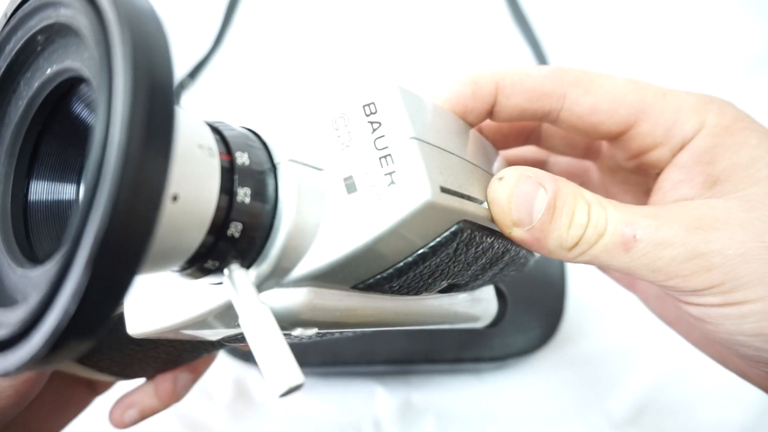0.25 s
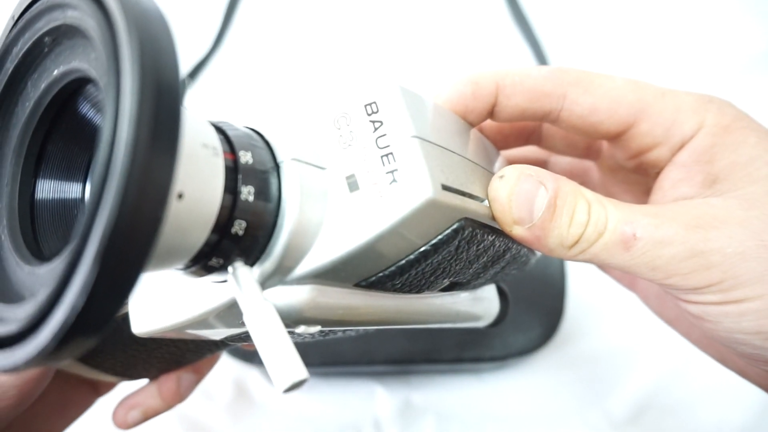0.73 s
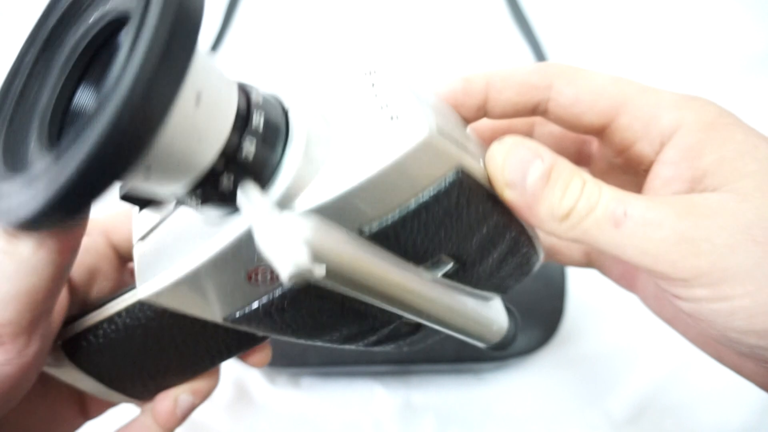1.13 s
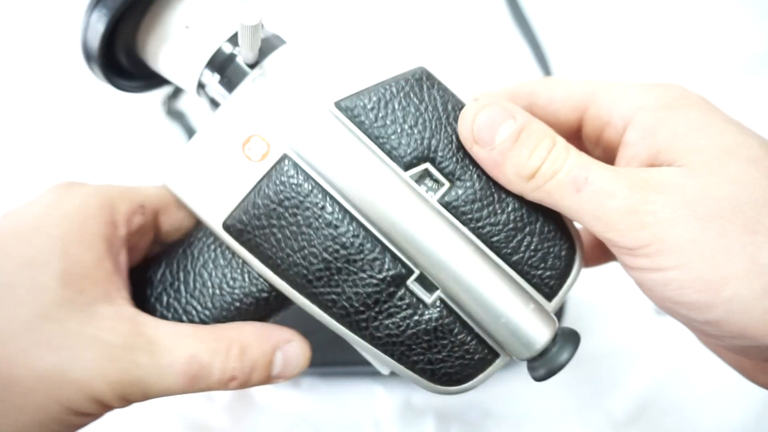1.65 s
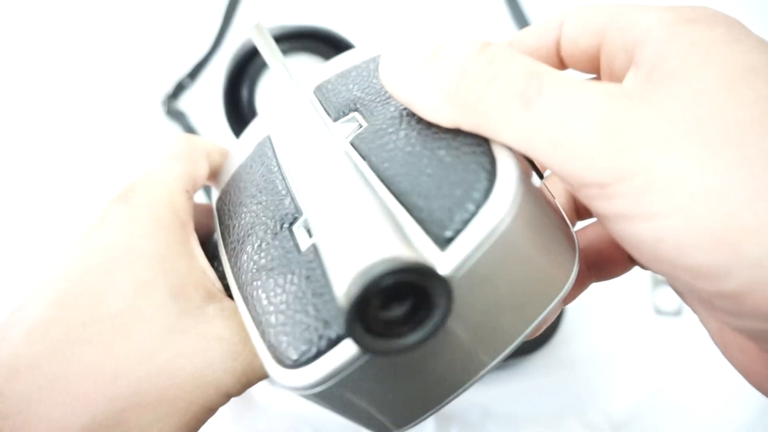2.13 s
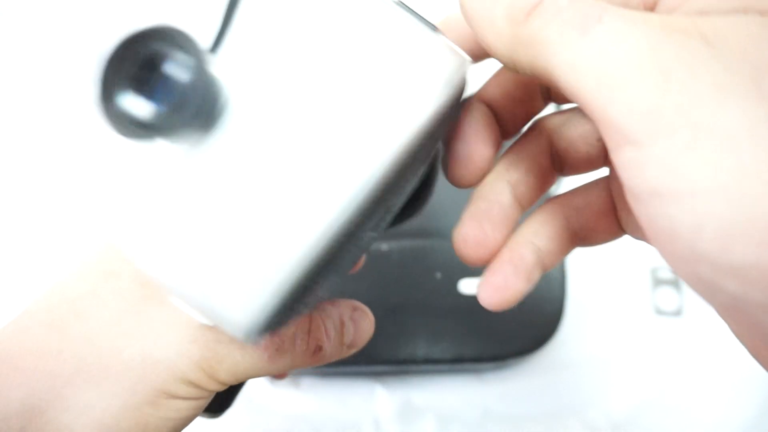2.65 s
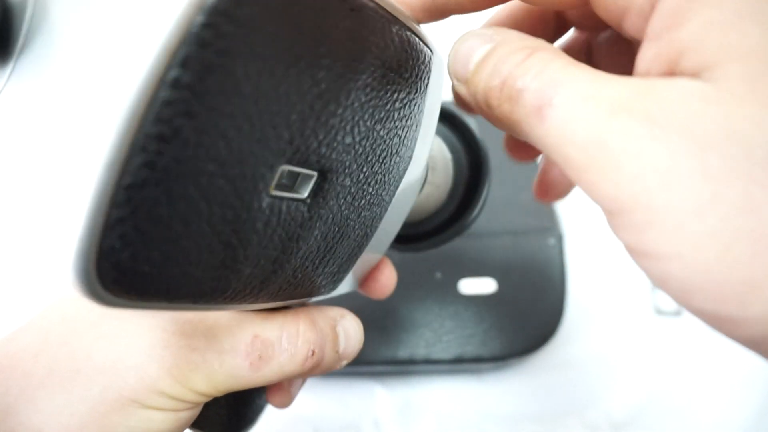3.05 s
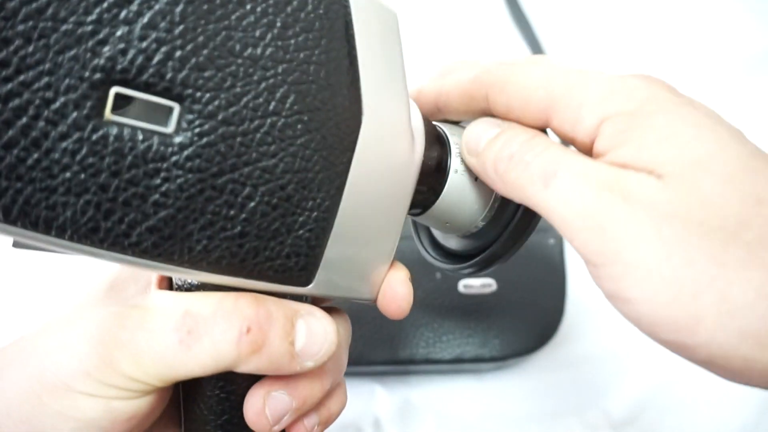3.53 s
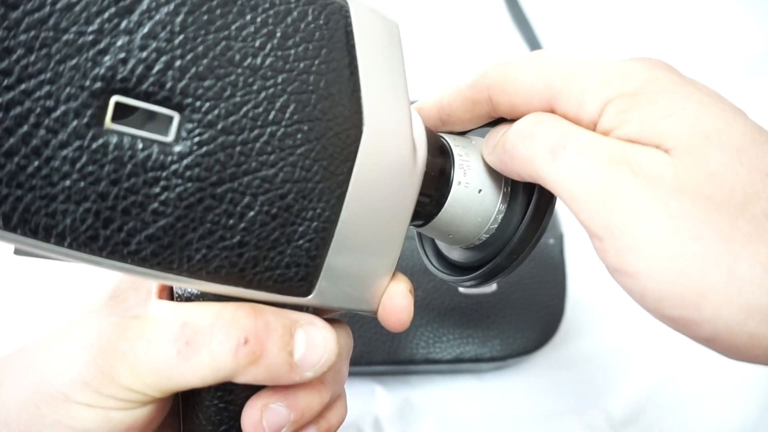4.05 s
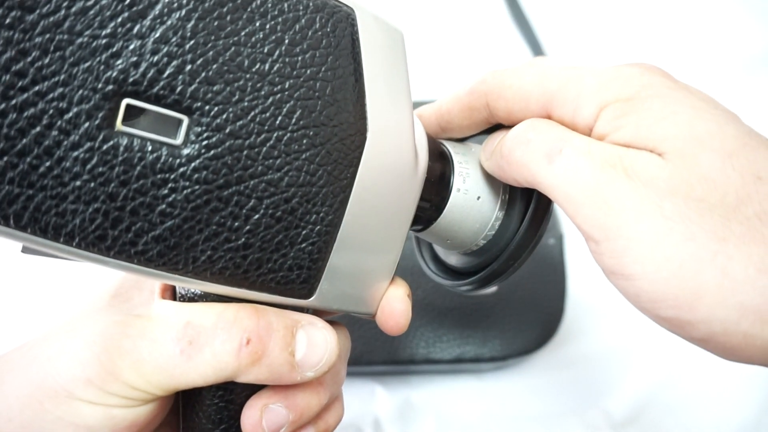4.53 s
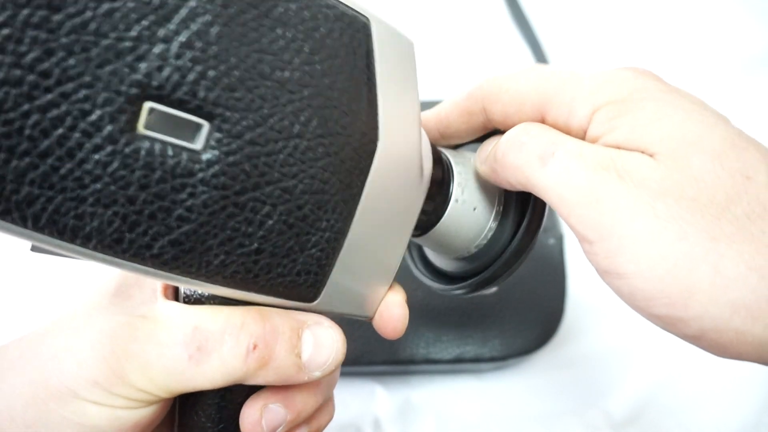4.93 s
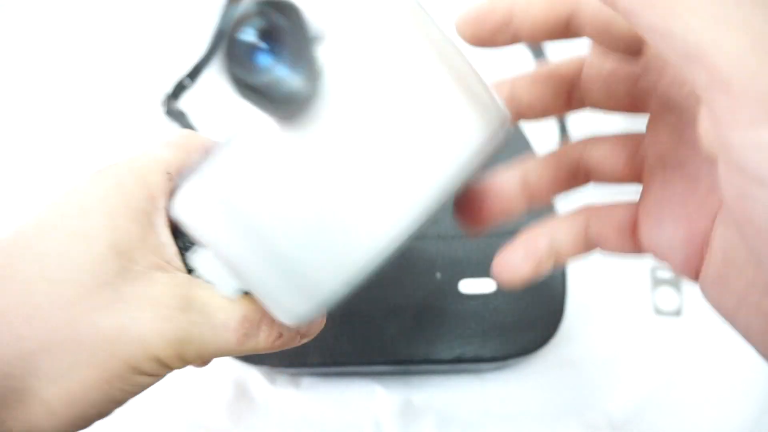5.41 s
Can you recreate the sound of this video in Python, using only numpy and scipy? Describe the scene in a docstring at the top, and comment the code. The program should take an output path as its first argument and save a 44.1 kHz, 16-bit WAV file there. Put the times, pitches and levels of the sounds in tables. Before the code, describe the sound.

Close ticking, rattling clockwork whir cuts off at a hard click with ringing springs; soft hand rubs follow, then a rougher second run winds down.

```python
"""A small film camera is held close to the microphone in a quiet room with a low hum.
It is running at first: gears rattle the case while the film claw ticks once a frame.
This run stops abruptly, just before a sharp latch click leaves springs ringing; hands then rub the grip.
The motor gathers speed again with catching teeth, runs, and dies away with a few ticks and a short ping.
Filtered noise makes the rough contacts, single pulses the blows, and sine waves the ringing parts and hum."""
import sys
import numpy as np
from scipy import signal
from scipy.fft import rfft, irfft
from scipy.io import wavfile

SR = 44100
rng = np.random.default_rng(int(sys.argv[2]) if len(sys.argv) > 2 else 0)


def bounce(signal):
    """Save signal as a 16-bit WAV file at the path given by the first command-line argument."""
    frames = np.transpose(np.atleast_2d(signal))
    limited = np.clip(frames, -1, 1)
    pcm = np.round(limited * 32767).astype(np.int16)
    wavfile.write(sys.argv[1], SR, pcm)


N = 250047
# the moment of every sample [s], and the pitches at which colours are worked out [Hz]
TIME, HZ = np.arange(N) / SR, np.fft.rfftfreq(4096, 1 / SR)

# Levels in the tables are relative: each sound also has its own overall level.
# A t60 is the time a sound takes to fall by 60 dB.

# steady air noise of the room: (frequency [Hz], level [dB])
AIR_COLOUR = [(20, 0.5), (35, -15), (50, -13), (70, -8.5), (100, -5), (130, -0.5), (165, -8), (215, 1.5),
              (280, -8.5), (450, -10.5), (700, -14.5), (1300, -17), (1900, -24), (2400, -25), (3500, -30.5),
              (8000, -34.5), (15800, -38)]
AIR_DB = -60
# low hum: (frequency [Hz], middle level [dB])
HUM_TONES = [(69.5, -71), (195, -65.5)]
# how long the room's echo lasts: (frequency [Hz], t60 [s])
ROOM_DECAY = [(200, .4), (560, 0.99), (800, 0.72), (2100, 0.81), (2620, 0.84), (3100, 0.73), (6000, 0.78),
              (10000, 0.59), (15000, 0.54)]

# how sound spreads over the two microphones: (frequency [Hz], side minus mid [dB])
STEREO_WIDTH = [(100, -17), (300, -6.5), (600, -13), (1100, -11.5), (2300, -3), (5000, -7.5), (15000, -8)]
# how the motor leans to one ear: (frequency [Hz], left minus right [dB])
STEREO_LEAN = [(200, 2), (600, -0.5), (1200, 1.5), (2500, 2), (5000, 0.5), (8400, 4.5), (15000, 5.5)]

# low rumble swells: (start [s], length [s], level [dB])
RUMBLE_SWELLS = [(0, 0.27, -67), (1.87, 0.215, -60)]
# resonance of the rumble: (frequency [Hz], width [Hz], level [dB])
RUMBLE_MODES = [(74, 21, 0)]
# hands rubbing the leather grip: (start [s], length [s], level [dB], highest frequency [Hz])
GRIP_RUBS = [(1.333, 0.3, -82, 308), (1.572, 0.32, -61, 515), (1.818, 0.48, -61.5, 543),
             (2.06, 0.088, -61.5, 725), (2.207, 0.15, -58.5, 710), (2.401, 0.25, -62.5, 493),
             (2.582, 0.22, -61, 870), (5.399, .4, -63.5, 380)]
# dull colour of a rub: (frequency [Hz], level [dB])
RUB_COLOUR = [(60, -20), (130, -6), (220, -2), (400, 3), (520, -0.5), (700, 0), (1100, -3), (16000, -40)]
# faint hiss of the skin: (frequency [Hz], level [dB])
SKIN_COLOUR = [(600, -27), (1100, -16), (1700, -3), (2300, 0), (3500, -17), (8000, -27), (16000, -30)]
SKIN_DB = -12

# case with its lens side towards the microphone: (frequency [Hz], level [dB])
FRONT_SPECTRUM = [(150, -50), (250, -16.5), (467, -10.5), (585, -3), (967, -12.5), (1130, -8.5),
                  (1780, -13.5), (2430, -8.5), (3320, -17.5), (3680, -17), (4530, -18.5), (5580, -15.5),
                  (11400, -21.5), (15800, -29)]
# its resonances: (frequency [Hz], width [Hz], level [dB])
FRONT_RESONANCES = [(598, 40, -3.5), (1133, 50, 3.5), (1540, 75, -11.5), (2270, 350, -10),
                    (3680, 150, -6.5), (4800, 61, -13), (5500, 240, -13.5), (6440, 120, -14),
                    (8700, 60, -14.5), (11100, 180, -23)]
# case with its flank towards the microphone: (frequency [Hz], level [dB])
FLANK_SPECTRUM = [(200, -21), (400, -12.5), (450, -12.5), (520, -7.5), (670, -3.5), (770, -13.5), (920, -5),
                  (1250, -10.5), (1650, -22), (2400, -13), (3400, -21), (4500, -26.5), (7500, -29),
                  (13500, -37.5), (15800, -35)]
# its resonances: (frequency [Hz], width [Hz], level [dB])
FLANK_RESONANCES = [(402, 14, -9.5), (585.6, 28.7, 7.5), (1110, 83, 2), (1424, 39, -8), (2080, 220, -20.5),
                    (4007, 85, -17), (5500, 230, -26.5), (8020, 360, -25), (9500, 120, -28),
                    (11050, 180, -32), (15200, 180, -34)]
# scrape of the claw: (frequency [Hz], level [dB])
CLAW_SPECTRUM = [(300, -21.5), (1000, 7), (2500, 2), (4500, 3.5), (8000, -1.5), (12500, -8), (14000, -10),
                 (16000, -16)]
# its resonances: (frequency [Hz], width [Hz], level [dB])
CLAW_RESONANCES = [(5420, 260, 3), (8400, 320, -0.5), (11200, 350, -6)]
# where each small moving part sounds most: (frequency [Hz])
PART_HZ = [2057, 2920, 4025, 5560, 8270, 11600, 14800]

# runs of the motor: (start [s], starting speed [frames/s], full speed [frames/s])
MOTOR_RUNS = [(-.025, 20.85, 20.85), (2.70, 13.72, 18.955)]
SPIN_UP_S = .979  # time in which the gap to full speed shrinks to about a third
# the first run stops abruptly; the second is released and dies away
STOPPED_S, RELEASED_S = 0.97, 5.11
STOPPED_FALL_DB_PER_S, RATTLE_FALL_DB_PER_S, WHIRR_FALL_DB_PER_S = 898, 156, 135
# a slow motor is quiet: it catches, then its large gears (rattle) and small ones (whirr) swell
CATCH_S, SWELL_S, RATTLE_SWELL_DB, WHIRR_SWELL_DB = 0.094, 0.45, 8.5, 17
CLAW_FOLLOW = 2 / 3  # the claw follows the large gears more than the small ones
# the small gears' throb: depth, slip [frames] and spread from beat to beat
MESH_DB, MESH_SLIP_FRAMES, MESH_UNEVEN_DB = 2, 0.035, 1.0
TOOTH_T60_S, TEETH_TOP_HZ = 0.015, 5470

# small clicks of trigger, claw and fingers: (time [s], tick level [dB], tick's brightest frequency [Hz],
# knock level [dB], knock's strongest frequency [Hz], left minus right of the tick [dB])
SMALL_CLICKS = [(.102, -52, 8000, -39, 2000, -2), (0.12, -40, 7050, -30, 1500, -3),
                (.314, -40, 8000, -42, 1210, 0), (.602, -37.5, 5000, -28, 2200, 2),
                (0.7, -42, 5700, -30, 2000, 0), (.793, -41, 5700, -40, 2000, 5),
                (.949, -40.5, 2700, -31, 2600, 5), (.9757, -30.5, 6600, -14.5, 2300, 6),
                (.987, -60, 3000, -17, 1350, -1), (.9912, -56, 3000, -17.5, 1300, -1),
                (1.27, -42.5, 8020, -33, 1500, 3), (1.364, -72, 3500, -39, 1300, -1),
                (1.484, -66, 5970, -41, 2000, 2), (2.0794, -45.5, 4470, -28.5, 550, 4),
                (2.2391, -41, 7500, -32.5, 900, 2.5), (2.5097, -38.5, 8100, -20.5, 1030, 2),
                (2.773, -53, 6000, -32, 1010, 2), (5.119, -32.5, 12500, -36, 1090, 3.5),
                (5.170, -40.5, 4200, -25, 1100, -2), (5.2408, -44, 9500, -26.5, 1090, 9),
                (5.298, -63, 10000, -37, 1000, 2), (5.4045, -54, 4970, -29.5, 890, 1),
                (5.4329, -54, 6000, -32, 900, 3), (5.523, -56, 6500, -38, 910, 8)]
# colour of a tick: (frequency [Hz], level [dB])
TICK_COLOUR = [(500, -37), (1500, -0.5), (3000, -3), (5000, -4.5), (7000, -4.5), (10000, -4.5),
               (13000, -15), (16000, -22)]
TICK_T60_S, TICK_Q = 0.023, 1
# how the case answers a knock: (frequency [Hz], width [Hz], level [dB])
KNOCK_RESONANCES = [(360, 130, -4), (585, 44, 9.5), (880, 200, -4.5), (1210, 106, 4), (1615, 75, 1.5),
                    (2600, 300, -0.5)]
# how narrowly a blow picks its part of the case, and how long after the tick it lands
KNOCK_Q, KNOCK_DELAY_S = 1.2, 0.00149
# metal parts left ringing: (frequency [Hz], level [dB], t60 [s])
RINGING_PARTS = [(504, -4, 0.41), (568, 4.5, 0.27), (1137, 0, 0.42), (1300, -5, 0.8), (1380, -8, 0.79),
                 (1630, -3, 0.46), (2340, -13, .9), (2450, -4, 0.7), (2570, -4.5, 0.69), (2623, -4.5, 0.88),
                 (3198, 1.5, 0.28), (3815, -6, 0.36), (4900, -7, .45), (7800, -13.5, .42), (12400, -8, .35),
                 (12860, -11, .35)]

# the latch snaps home and rebounds: (time [s], level [dB], t60 [s])
LATCH_HITS = [(1.0, -14, 0.0085), (1.0015, -24.5, 0.024), (1.0085, -38, 0.02), (1.011, -33.5, 0.027),
              (1.014, -34, 0.025), (1.0445, -37, 0.012)]
# latch colour towards the microphone: (frequency [Hz], level [dB])
LATCH_DIRECT = [(180, -39), (340, -16), (550, -14), (850, -9), (1150, -8.5), (1900, -5), (2560, 0),
                (3200, -4.5), (3750, -0.5), (4300, -6), (5200, 3.5), (6200, -8), (7500, -5), (12500, -11),
                (15800, -10)]
# latch colour sent out into the room: (frequency [Hz], level [dB])
LATCH_TO_ROOM = [(200, -33), (440, -6), (545, -21), (680, -11), (880, -5.5), (1180, -4), (1800, -5.5),
                 (2560, 1), (3200, -5), (3800, -4), (7500, -5.5), (9500, -10.5), (12500, -8.5),
                 (15800, -18)]

# teeth that catch and jump free in the second run: (time [s], snap level [dB], thud level of the case [dB])
TOOTH_CATCHES = [(2.843, -45, -19), (2.927, -29, -17), (3.024, -20.5, -28), (3.057, -26.5, -42),
                 (3.13, -29, -11), (3.171, -34, -28), (3.24, -32, -39), (3.311, -31, -22),
                 (3.3485, -21, -23), (3.3615, -22.5, -24), (3.4013, -28, -39), (3.4158, -19.5, -21),
                 (3.4711, -19, -14), (3.4838, -22, -27), (3.5088, -20, -17), (3.532, -23, -15),
                 (3.544, -20, -11.5), (3.577, -24, -13), (3.6274, -24, -22), (3.6737, -23, -17),
                 (3.888, -28, -19), (3.903, -22, -20), (3.940, -20.5, -23), (4.011, -26, -31),
                 (4.036, -25, -21), (4.0633, -20.5, -35), (4.1242, -20, -22), (4.182, -37, -16.5),
                 (4.2374, -20, -17), (4.2505, -17, -14), (4.291, -19, -15), (4.4, -20.5, -13.5),
                 (4.4237, -21, -25), (4.458, -19.5, -33), (4.484, -22.5, -10.5), (4.526, -20, -11),
                 (4.5775, -21.5, -43), (4.604, -24, -38), (4.6205, -19.5, -29), (4.6565, -18.5, -21),
                 (4.686, -25, -11), (4.729, -19.5, -26), (4.7987, -21, -16), (4.820, -19, -18),
                 (4.908, -26, -11), (4.947, -21.5, -36), (4.9838, -21, -26), (5.0024, -26, -26),
                 (5.0438, -20, -14)]
SNAP_T60_S, CATCH_LEAN_DB = 0.02, 1

# the ping of the mechanism coming to rest
SETTLE_S, SETTLE_HZ, SETTLE_DB, SETTLE_T60_S = 5.244, 1071, -40, 0.082
EDGE_HZ = 15850  # the recorder passes little above this


def gain_of(db):
    """Turns decibels into a factor for the size of a wave."""
    return 10 ** (np.asarray(db) / 20)


def evened(x):
    """Scales a signal so that its average strength (rms) is one."""
    return x / np.sqrt(np.mean(x ** 2) + 1e-20)


def read(points, hz=HZ):
    """Reads a table between its points, with pitch spaced by ratio as we hear it."""
    f, value = np.transpose(points)
    return np.interp(np.log(hz + 1), np.log(f + 1), value)


def wander(hz):
    """Makes a random drift of unit strength, mostly slower than the given rate."""
    rates = np.fft.rfftfreq(N, 1 / SR)
    spectrum = rfft(rng.standard_normal(N))
    return evened(irfft(spectrum / (1 + (rates / hz) ** 4), N))


def arch(start, length):
    """Loudness that swells and fades once."""
    return np.sqrt(np.sin(np.pi * np.clip((TIME - start) / length, 0, 1)) + 1e-20)


def dying(s, t60):
    """Loudness that starts at once at time s and dies away."""
    return (TIME >= s) * gain_of(-60 * np.clip((TIME - s) / t60, 0, 3))


def add(mix, s, sound):
    """Adds a short sound to the mix at time s, cut off at the end of the scene."""
    part = mix[..., round(s * SR):][..., :sound.shape[-1]]
    part += sound[..., :part.shape[-1]]


def peaks(modes):
    """A body favours its own pitches: the joint gain of its resonances."""
    return np.sqrt(sum((gain_of(db) / (1 + ((HZ - hz) / width) ** 2)) ** 2 for hz, width, db in modes))


def tint(x, gain):
    """Colours a sound as a struck body does: the ringing comes after each click, never before."""
    log_gain = np.log(np.maximum(gain, 1e-5))
    circle = np.concatenate([log_gain, log_gain[-2:0:-1]])
    # this choice of phase (minimum phase) makes the filter respond as early as it can
    response = np.fft.ifft(np.exp(np.conj(signal.hilbert(circle)))).real
    return signal.oaconvolve(x, response)[:len(x)]


def radiate(force, colour):
    """Rough contact is noise that follows a force, coloured by a body and spread over two microphones."""
    colour = evened(colour)
    mid = tint(force * rng.standard_normal(len(force)), colour)
    side = tint(force * rng.standard_normal(len(force)), colour * gain_of(read(STEREO_WIDTH)))
    return np.array([mid + side, mid - side])


def impacts(per_s, spread_db):
    """Rough surfaces give random tiny impacts, a few much harder than the rest."""
    hardness = gain_of(spread_db * np.minimum(rng.exponential(1, N), 4))
    return evened((rng.random(N) < per_s / SR) * hardness)


def train(hits):
    """Places single pulses, given as (time [s], energy [dB])."""
    force = np.zeros(N)
    for s, db in hits:
        force[round(s * SR)] += gain_of(db)
    return force


def blows(hits, colour):
    """A clean blow is one pulse (time [s], energy [dB]) coloured by the body it strikes."""
    return tint(train(hits), evened(colour))


def room(x, early_db, tail_db):
    """Early reflections from table and walls, then a tail that fades at its own rate at each pitch."""
    t = TIME[:SR]
    hz, when, z = signal.stft(rng.standard_normal((2, SR)), SR, nperseg=256)
    fade = gain_of(-60 * when / read(ROOM_DECAY, hz)[:, None])
    tail = signal.istft(z * fade, SR, nperseg=256)[1][:, :SR]
    tail = tail * np.clip((t - .008) / 0.011, 0, 1)
    early = rng.standard_normal((2, SR)) * (t > .008) * np.exp(-t / 0.0059)
    echo = (gain_of(early_db) * evened(early) + gain_of(tail_db) * evened(tail)) / np.sqrt(SR)
    wet = signal.fftconvolve(x, echo, axes=1)[:, :N]
    # the bass stays mostly dry this close to the camera
    return signal.lfilter(*signal.butter(1, 700, "high", fs=SR), wet)


def background():
    """Steady air noise, and low sine tones that waver in level and pitch."""
    hum = 0
    for hz, db in HUM_TONES:
        level = gain_of(db + 4.9 * wander(1.56))
        hum = hum + level * np.sin(2 * np.pi * hz * TIME + 0.84 * wander(3.2))
    air = gain_of(AIR_DB) * radiate(np.ones(N), gain_of(read(AIR_COLOUR)))
    return (air + hum) * gain_of([[-.8], [.8]])


def rumble():
    """A low rumble swells and fades: noise through one low resonance."""
    force = sum(gain_of(db) * arch(s, length) for s, length, db in RUMBLE_SWELLS)
    return radiate(force, peaks(RUMBLE_MODES))


def travel(start, slow, full):
    """Frames of film pulled so far, as the motor eases up to its full speed."""
    age = np.maximum(TIME - start, 0)
    return full * age - (full - slow) * SPIN_UP_S * (1 - np.exp(-age / SPIN_UP_S))


def release(s, db_per_s):
    """Full level until s, then a steady fall."""
    return gain_of(-np.minimum(db_per_s * np.maximum(TIME - s, 0), 200))


def clatter(force, colour, per_s, spread_db, uneven_db):
    """Several small parts strike at their own moments, each in its own range of the colour."""
    colour, sound = evened(colour), 0
    for share in np.eye(len(PART_HZ)):
        part = colour * np.sqrt(read(list(zip(PART_HZ, share))))
        strikes = force * impacts(per_s, spread_db) * gain_of(uneven_db * wander(50))
        sound = sound + np.sqrt(np.mean(part ** 2)) * radiate(strikes, part)
    return sound


def chatter(force, t60):
    """Draws each pulse out into a short chatter of the same energy."""
    t = TIME[:2048]
    fade = gain_of(-60 * t / t60) * np.minimum(t / .0018, 1)
    return signal.oaconvolve(force, fade / np.linalg.norm(fade))[:N]


def tooth_colour(case):
    """A gear tooth excites the middle range of the case."""
    return case / np.sqrt((1 + (1500 / (HZ + 1)) ** 6) * (1 + (HZ / TEETH_TOP_HZ) ** 4))


def throb(frames):
    """Small gears beat three times a frame, each beat in three flutters, with uneven hardness."""
    turns = frames + MESH_SLIP_FRAMES * wander(2)
    beat = (3 * np.maximum(turns, 0)).astype(int)
    ripple = np.cos(2 * np.pi * 3 * turns) / 2 + np.cos(2 * np.pi * 9 * turns)
    uneven = rng.standard_normal(N)[beat]
    return evened(gain_of(MESH_DB * ripple + MESH_UNEVEN_DB * uneven))


def motor(drive, whirr, frames, case, claw_db, stroke, return_db, lurch_db, hard_db, jolt_db, teeth_db):
    """Large gears rattle the case, small ones whirr, and the claw scrapes forward and back once a frame."""
    # the strokes of the claw vary in hardness and length; stroke is in frames
    phase, frame = frames % 1, frames.astype(int)
    hard, long = rng.standard_normal((frame.max() + 1, 2))[frame].T
    age = phase / (stroke * np.exp(0.28 * long))
    pull = gain_of(hard_db * hard) * (age * np.exp(1 - age)) ** 2
    # the return comes half a frame later
    back = gain_of(return_db) * np.exp(-((phase - .5) % 1) / 0.081)
    claw_drive = drive ** CLAW_FOLLOW * whirr ** (1 - CLAW_FOLLOW)
    claw_force = claw_drive * gain_of(claw_db) * (pull + back)
    claw_colour = gain_of(read(CLAW_SPECTRUM)) + peaks(CLAW_RESONANCES)
    claw = clatter(claw_force, claw_colour, per_s=5000, spread_db=2.1, uneven_db=3.0)

    # the gears are loaded four times a frame; the level changes at each pull and lurches with their slack
    strain = gain_of(jolt_db * pull + lurch_db * wander(76))
    load = strain * gain_of(2.0 * np.cos(4 * 2 * np.pi * frames))
    # large gears take the lower part of the case's colour, small gears the rest
    soft = 1 / (1 + (HZ / 1700) ** 6)
    gears = radiate(drive * load * impacts(5000, 0.94), case * np.sqrt(soft))
    small_force = gain_of(-2) * whirr * strain * throb(frames)
    gears += clatter(small_force, case * np.sqrt(1 - soft), per_s=3000, spread_db=1.5, uneven_db=2.0)

    # single teeth chatter along with the whirr
    teeth = evened(chatter(impacts(170, 1.0), TOOTH_T60_S))
    gears += radiate(gain_of(teeth_db) * whirr * teeth, tooth_colour(case))
    left, right = gears + claw
    lean_db = read(STEREO_LEAN) / 2
    return np.array([tint(left, gain_of(lean_db)), tint(right, gain_of(-lean_db))])


def first_run():
    """Already at full speed, lens side to the microphone, the motor stops abruptly just before the latch."""
    front = gain_of(read(FRONT_SPECTRUM)) + gain_of(-3) * peaks(FRONT_RESONANCES)
    on = release(STOPPED_S, STOPPED_FALL_DB_PER_S)
    return motor(gain_of(-51.0) * on, gain_of(-56.0) * on, travel(*MOTOR_RUNS[0]), front,
                 claw_db=-0.4, stroke=0.098, return_db=-12.5, lurch_db=0.16,
                 hard_db=1.3, jolt_db=-1.0, teeth_db=-4.5)


def knock_colour(hz):
    """The case answers a blow most strongly near hz, with little bass from so small a body."""
    reach = abs(1 + 1j * KNOCK_Q * (HZ / hz - hz / (HZ + 1)))
    no_bass = 1 + (260 / (HZ + 1)) ** 4
    dull = 1 + (HZ / 3600) ** 4
    return peaks(KNOCK_RESONANCES) / reach / no_bass / dull


def springs(centre_hz, reach_hz):
    """Springs and thin metal ring on as fading sine waves, strongest for parts near one pitch."""
    t = TIME[:SR]
    sound = 0
    for hz, db, t60 in RINGING_PARTS:
        size = gain_of(db) / (1 + ((hz - centre_hz) / reach_hz) ** 2)
        # starting points in turns, slightly different in each ear
        start = rng.random() + .25 * rng.random((2, 1))
        sound = sound + size * gain_of(-60 * t / t60) * np.sin(2 * np.pi * (hz * t + start))
    return sound


def taps():
    """Each click is a tick of its own brightness, a knock of its own pitch, a faint ring and the room's echo."""
    ticks, rings = np.zeros((2, 2, N))
    knocks, blow = np.zeros((1, N)), signal.unit_impulse(4096)
    fade = gain_of(-60 * TIME[:4096] / TICK_T60_S)
    ring = springs(centre_hz=2600, reach_hz=250)
    for s, tick_db, hz, knock_db, knock_hz, pan_db in SMALL_CLICKS:
        contact = 1 / abs(1 - (HZ / hz) ** 2 + 1j * HZ / (hz * TICK_Q))
        tick = gain_of(tick_db - 5.5) * radiate(fade, gain_of(read(TICK_COLOUR)) * contact)
        add(ticks, s, tick * gain_of([[pan_db / 2], [-pan_db / 2]]))
        knock = tint(blow, evened(knock_colour(knock_hz)))
        add(knocks, s + KNOCK_DELAY_S, gain_of(knock_db) * knock)
        add(rings, s, gain_of(0.77 * knock_db - 49.0) * ring)
    echoes = room(ticks, early_db=-11.0, tail_db=-4.5) + room(knocks, early_db=-9, tail_db=-4.0)
    return ticks + knocks + rings + echoes


def latch():
    """The latch hits and rebounds; the case knocks, springs ring and the room answers."""
    s = LATCH_HITS[0][0]
    force = sum(gain_of(db) * dying(at, t60) for at, db, t60 in LATCH_HITS)
    colour = gain_of(read(LATCH_DIRECT))
    crack = gain_of(-2.5) * radiate(force, colour) + blows([(s, -6)], colour)
    crack = crack * gain_of([[2], [-2]])
    knock = blows([(LATCH_HITS[1][0], -6.0)], knock_colour(hz=1110))
    into_room = blows([(s, 2.0)], gain_of(read(LATCH_TO_ROOM)))
    sound = crack + knock + room(into_room[None], early_db=-10.5, tail_db=-5.0)
    add(sound, s, gain_of(-46.0) * springs(centre_hz=3000, reach_hz=11000))
    return sound


def hands():
    """Skin catches on the grip in tiny dull impacts with a faint hiss, each rub swelling and fading."""
    grain = impacts(2500, 2.4) * gain_of(1.7 * wander(22) - 1.5)
    sound = np.zeros((2, N))
    for s, length, db, hz in GRIP_RUBS:
        force = gain_of(db) * arch(s, length) * grain
        force = force[round(s * SR):][:round(length * SR) + 2048]
        dull = evened(gain_of(read(RUB_COLOUR)) / (1 + (HZ / hz) ** 8))
        hiss = gain_of(SKIN_DB) * evened(gain_of(read(SKIN_COLOUR)))
        add(sound, s, radiate(force, dull + hiss))
    return sound


def swell(start, depth_db):
    """The gears catch, then grow louder as the motor gathers speed."""
    age = np.maximum(TIME - start, 0)
    return np.minimum(age / CATCH_S, 1) ** 2 * gain_of(-depth_db * np.exp(-age / SWELL_S))


def flank_colour():
    """The case as heard from its flank: a broad colour with resonances on top."""
    return gain_of(read(FLANK_SPECTRUM)) + gain_of(-5.5) * peaks(FLANK_RESONANCES)


def second_run():
    """Flank to the microphone, the motor gathers speed, runs and is let go."""
    start = MOTOR_RUNS[1][0]
    drive = swell(start, RATTLE_SWELL_DB) * release(RELEASED_S, RATTLE_FALL_DB_PER_S)
    whirr = swell(start, WHIRR_SWELL_DB) * release(RELEASED_S, WHIRR_FALL_DB_PER_S)
    return motor(gain_of(-45.0) * drive, gain_of(-50.5) * whirr, travel(*MOTOR_RUNS[1]), flank_colour(),
                 claw_db=-1.6, stroke=0.074, return_db=-11.0, lurch_db=0.84,
                 hard_db=0.85, jolt_db=0.0, teeth_db=-3.5)


def catches():
    """A tooth catches and jumps free: a dry chatter, and a thud through the case."""
    soft = 1 / (1 + (HZ / 1400) ** 6)
    snap_force = chatter(train([(s, db) for s, db, _ in TOOTH_CATCHES]), SNAP_T60_S)
    snap = radiate(snap_force, tooth_colour(flank_colour()))
    # the thud starts 1.2 ms after the snap
    thud_hits = [(s + 0.0012, db) for s, _, db in TOOTH_CATCHES]
    thud = gain_of(-4.0) * blows(thud_hits, flank_colour() * np.sqrt(soft))
    return (snap + thud) * gain_of([[CATCH_LEAN_DB / 2], [-CATCH_LEAN_DB / 2]])


def settle():
    """The mechanism pings as it comes to rest: one sine wave that quickly dies away."""
    tone = np.sin(2 * np.pi * SETTLE_HZ * (TIME - SETTLE_S))
    return gain_of(SETTLE_DB) * dying(SETTLE_S, SETTLE_T60_S) * tone


def scene():
    """Adds up the two motor runs, the latch, the rumble, the handling and the quiet room."""
    running = first_run() + second_run() + catches()
    running = running + room(running, early_db=-9.0, tail_db=-21.0)
    return background() + rumble() + running + taps() + latch() + hands() + settle()


def record(dry):
    """Sound reaches the right microphone a little later; the recorder then trims deep bass and top treble."""
    lag_s = .5 / SR
    delay = np.exp(-2j * np.pi * np.fft.rfftfreq(N, 1 / SR) * lag_s)
    right = irfft(rfft(dry[1]) * delay, N)
    thinned = signal.lfilter(*signal.butter(2, 52, "high", fs=SR), [dry[0], right])
    band_limit = signal.firwin(511, EDGE_HZ, window=("kaiser", 9), fs=SR)
    return signal.oaconvolve(thinned, band_limit[None], "same")


dry = scene()
out = record(dry)
bounce(out)
```